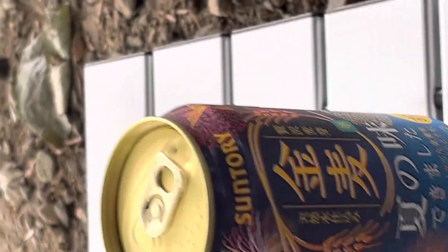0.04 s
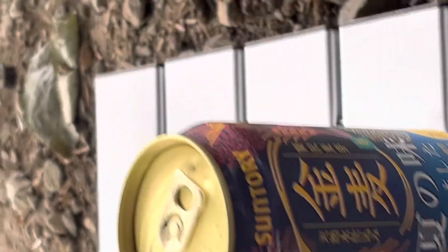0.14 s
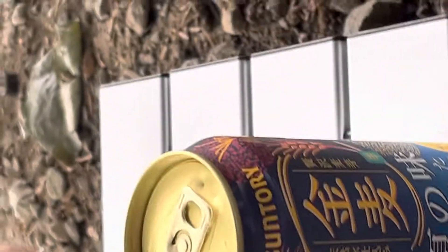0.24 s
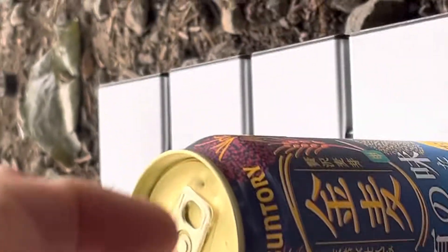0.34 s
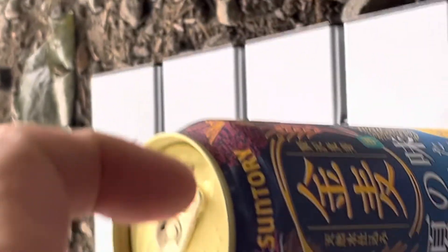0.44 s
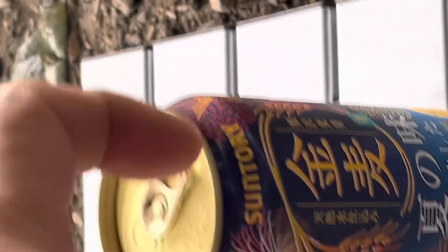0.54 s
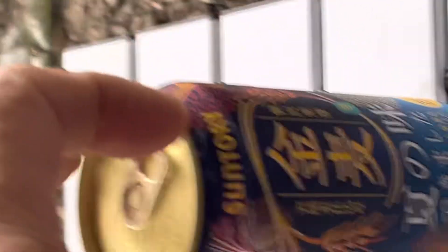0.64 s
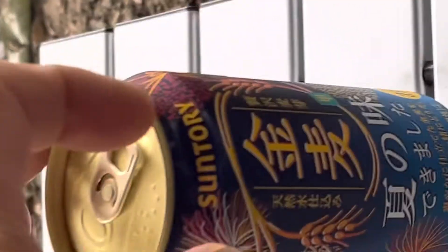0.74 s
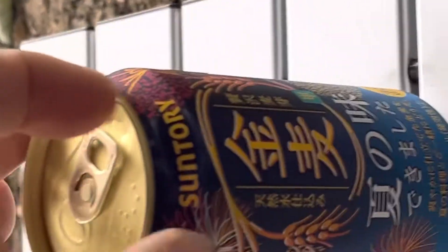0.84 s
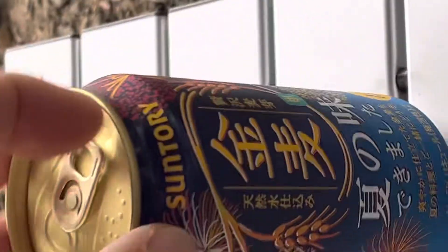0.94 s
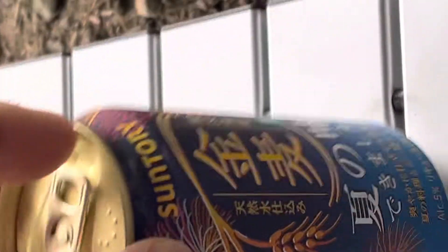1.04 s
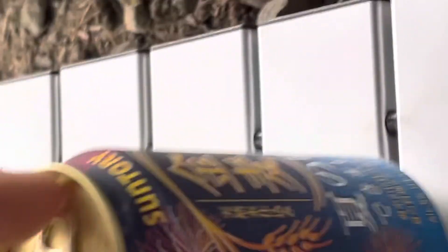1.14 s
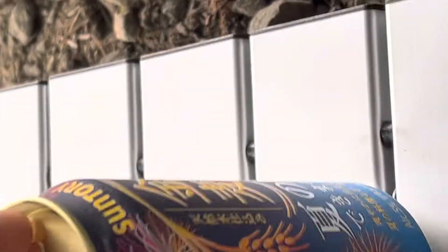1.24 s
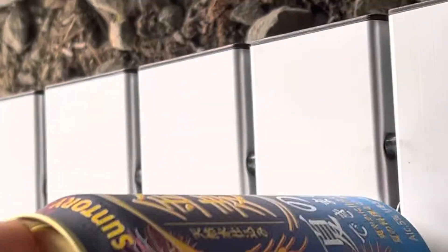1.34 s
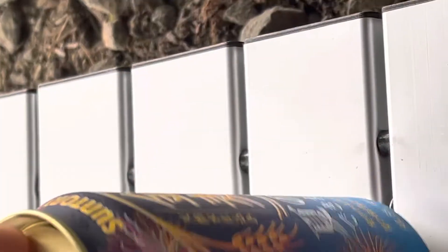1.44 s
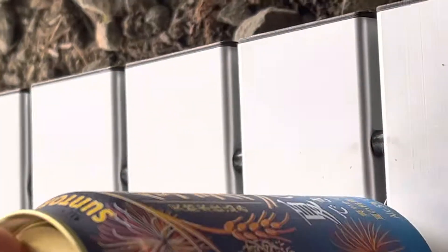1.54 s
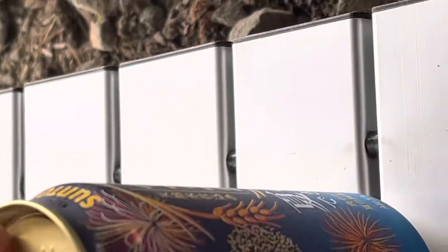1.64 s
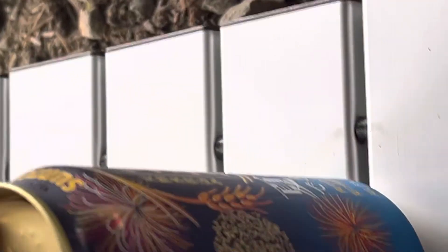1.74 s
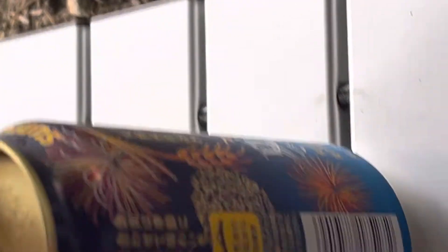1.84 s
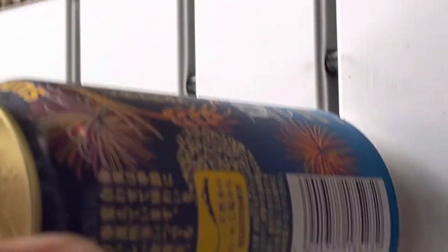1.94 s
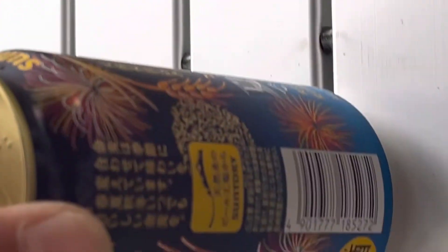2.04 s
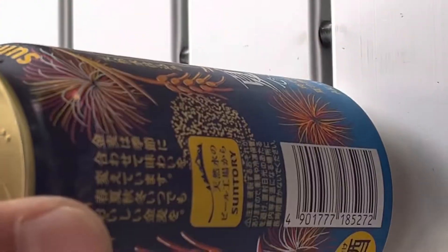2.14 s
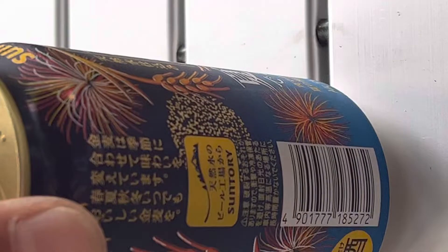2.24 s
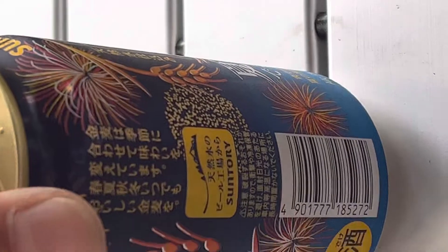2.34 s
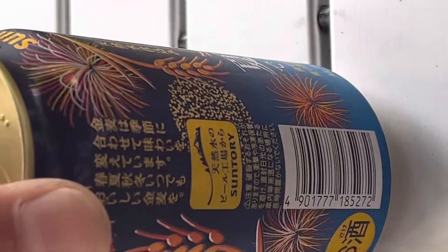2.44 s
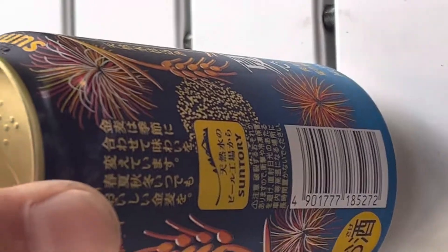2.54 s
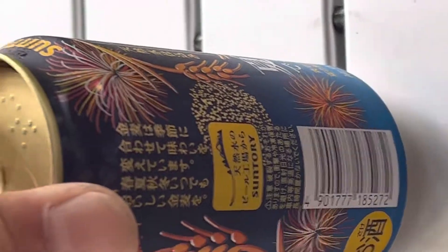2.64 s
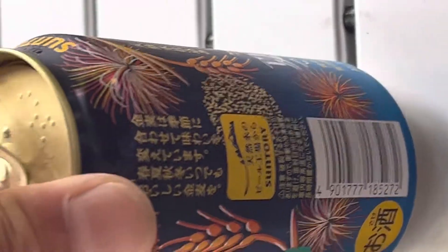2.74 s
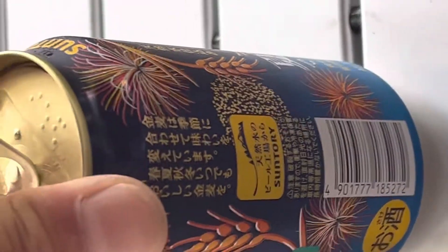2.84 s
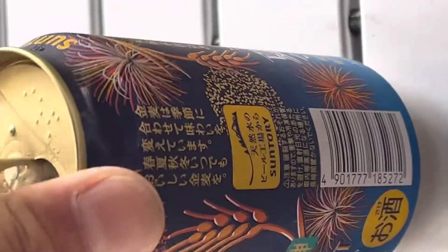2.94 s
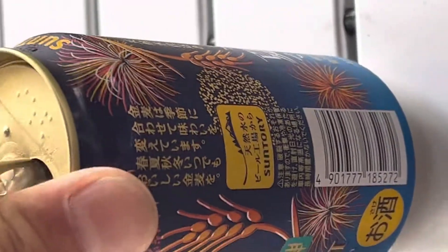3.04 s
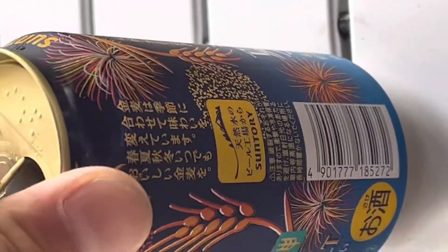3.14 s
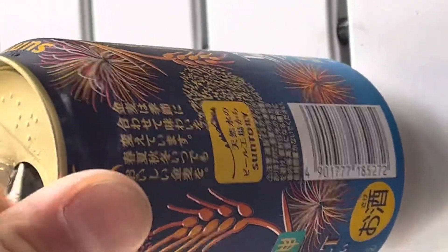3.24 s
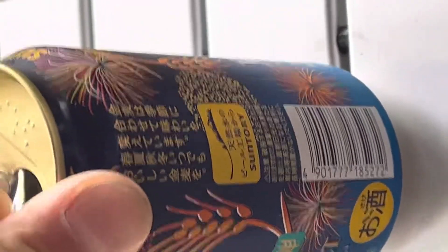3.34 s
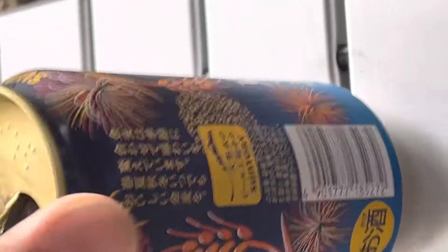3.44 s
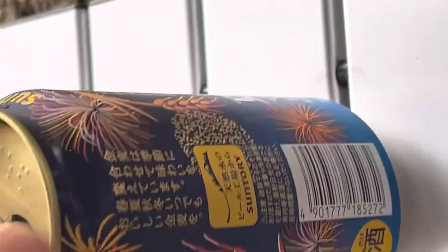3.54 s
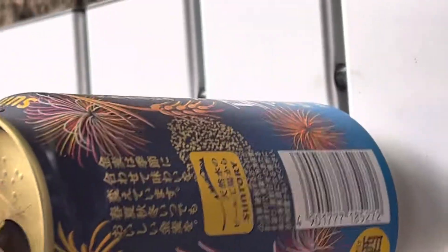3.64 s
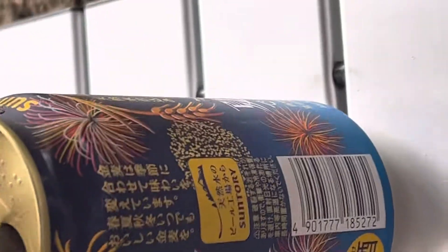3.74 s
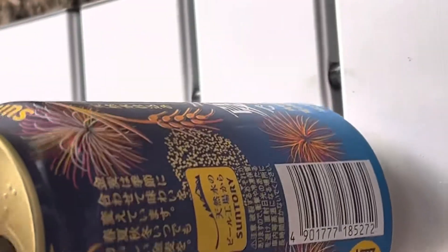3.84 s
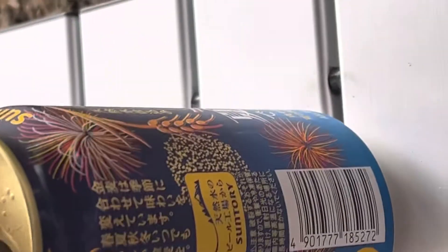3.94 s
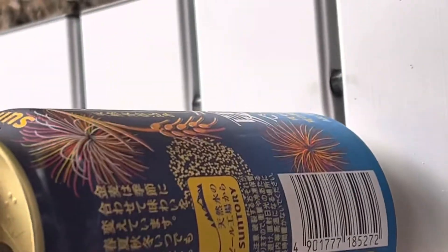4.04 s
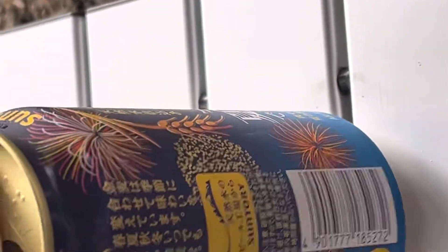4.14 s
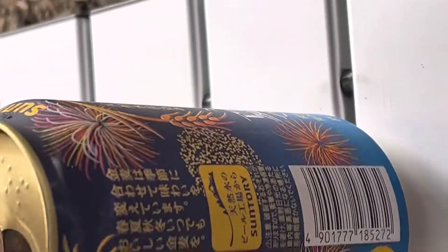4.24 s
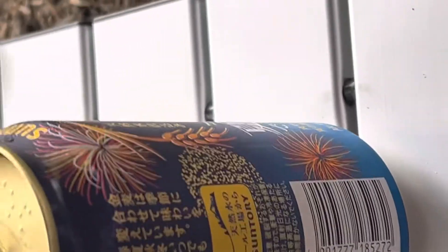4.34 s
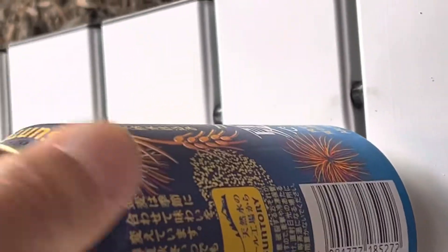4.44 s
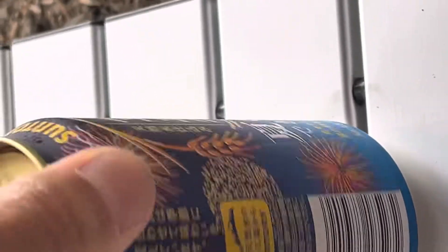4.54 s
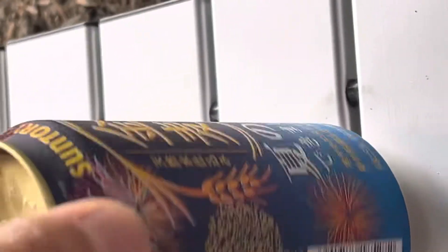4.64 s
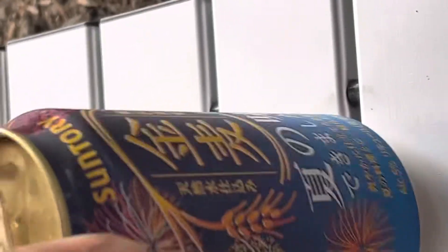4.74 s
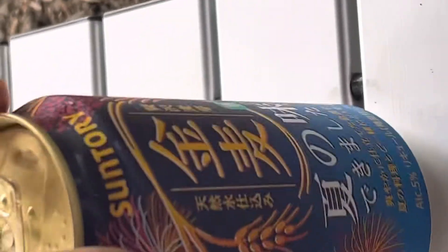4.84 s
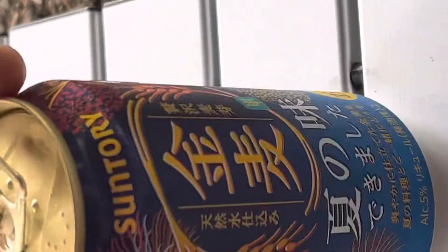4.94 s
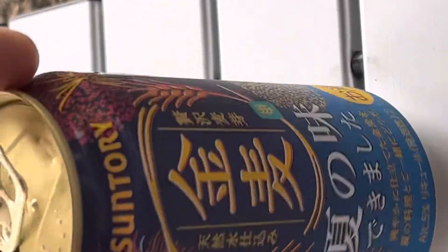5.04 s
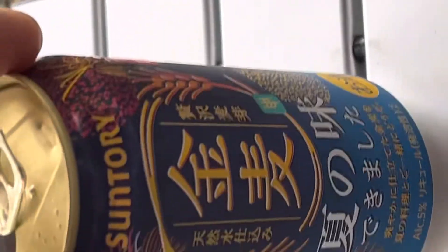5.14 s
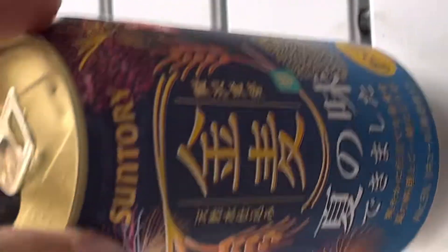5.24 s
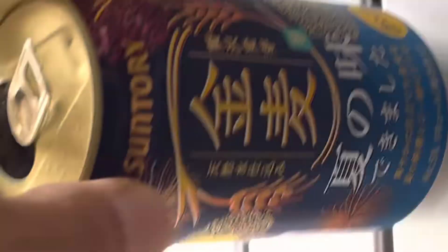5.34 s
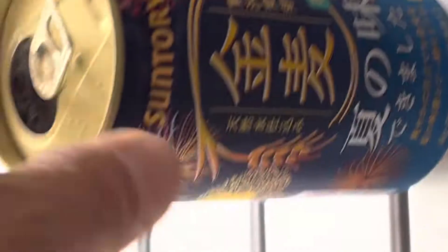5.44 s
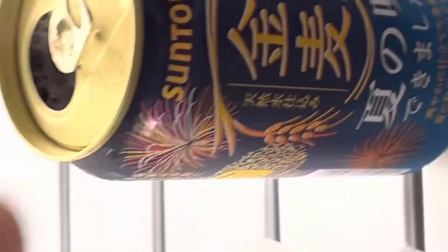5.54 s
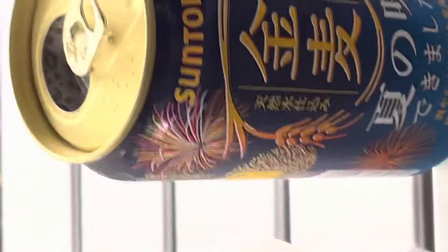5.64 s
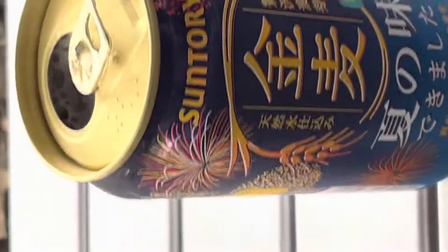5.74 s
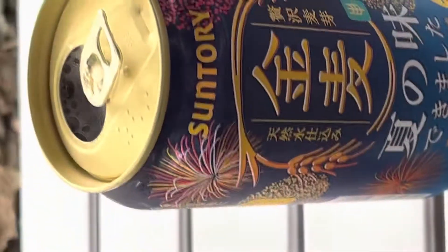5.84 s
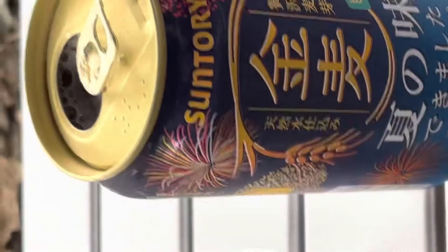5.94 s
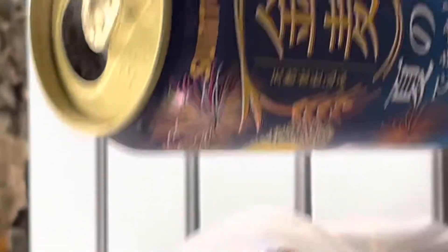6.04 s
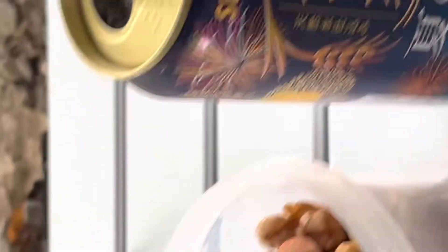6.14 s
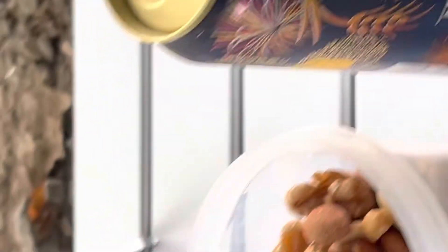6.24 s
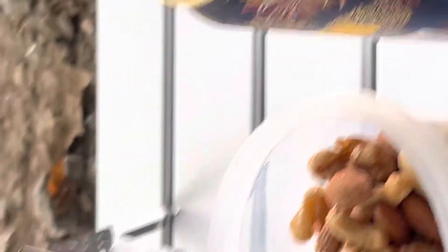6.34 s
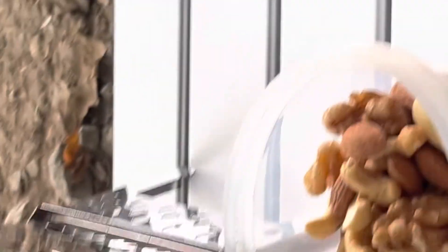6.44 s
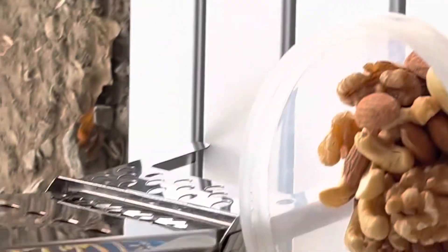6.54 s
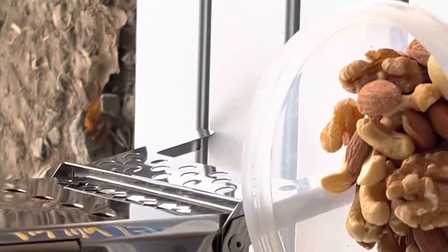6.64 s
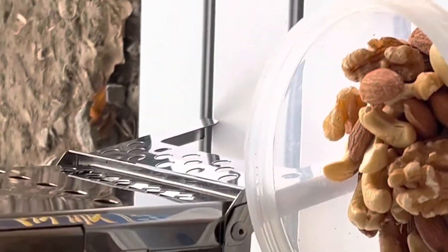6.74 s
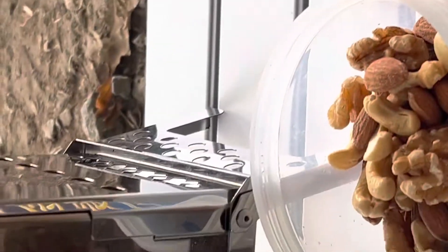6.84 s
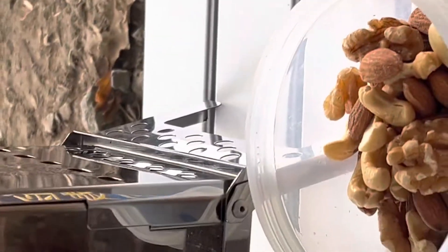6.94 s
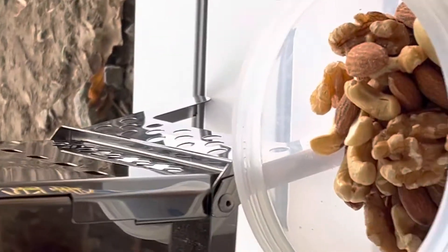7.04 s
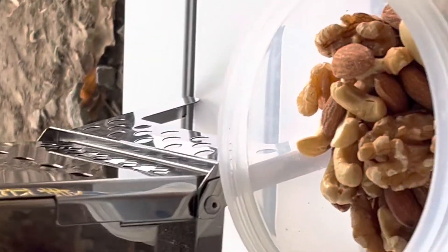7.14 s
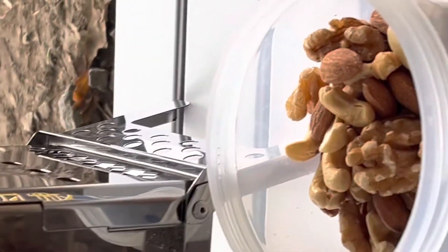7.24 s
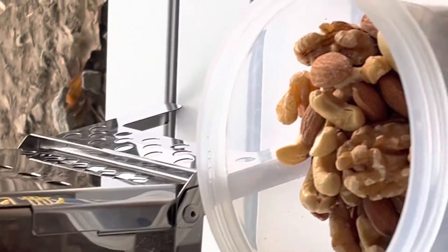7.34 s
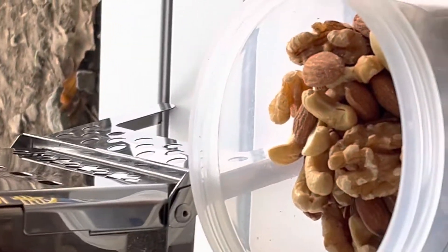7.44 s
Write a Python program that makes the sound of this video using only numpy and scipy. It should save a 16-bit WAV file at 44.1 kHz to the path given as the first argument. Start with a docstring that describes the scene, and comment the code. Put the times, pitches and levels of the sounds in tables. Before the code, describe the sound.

Very close to a small stereo microphone outdoors, skin and nails rub and tick on a full metal can. A loud crack and short gas hiss follow, then a rapid ripping snap as the lid gives way. The tab clicks back, the can is knocked and rubbed again, and the handling stops. Behind are quiet air, distant cicadas and thin bird chirps; near the end one cicada whistles downward in pulses.

```python
"""Opening a drink can outdoors

Skin and nails rub and tap a can on a metal table: noise and short blows ring the can's resonances.
The seal cracks with a hiss of coloured noise, the lid tears in quick jerks, and the tab is bent back.
Behind are far air, rumble, hum and a cicada chorus of noise, whistled cicada calls and swept bird chirps.
A small stereo microphone close by hears it all, with echoes."""
import sys
import numpy as np
from scipy import signal
from scipy.fft import rfft, irfft, next_fast_len
from scipy.io import wavfile

SR = 44100
rng = np.random.default_rng(int(sys.argv[2]) if len(sys.argv) > 2 else 0)


def master(y):
    """Save y as 16-bit WAV."""
    cut = np.clip(np.atleast_2d(y).T, -1, 1)
    pcm = np.round(cut * 32767)  # scale
    wavfile.write(sys.argv[1], SR, pcm.astype(np.int16))


N = 331191
T = np.arange(N) / SR  # time in seconds
SHORT = T[:SR // 3]  # time within one short sound or echo


def amp(db):
    """Turns decibels into gain."""
    return 10 ** (np.asarray(db) / 20)


def unit(x):
    """Scales a signal to rms 1."""
    return x / np.sqrt(np.mean(abs(x) ** 2) + 1e-30)


def decay(age, t60):
    """Dies away by 60 dB every t60 seconds."""
    return np.exp(-np.log(1000) * age / t60)


def curves(rows):
    """Joins the points of each column of a timed table by straight lines."""
    s, *columns = np.transpose(rows)
    return [np.interp(T, s, column) for column in columns]


def add(mix, s, sound):
    """Lays a sound into the mix at time s."""
    part = mix[round(s * SR):][:len(sound)]
    part += sound[:len(part)]


def through(x, response):
    """Passes a sound through a response, keeping its length."""
    return signal.oaconvolve(x, response)[:len(x)]


def colour(points, size=4096):
    """Makes a filter with the given spectrum that responds as early as it can (minimum phase)."""
    hz, db = np.transpose(points)
    bin_hz = abs(np.fft.fftfreq(size, 1 / SR))
    log_gain = np.log(amp(np.interp(np.log(bin_hz + 1), np.log(hz), db)))
    spectrum = np.exp(np.conj(signal.hilbert(log_gain)))
    return np.fft.ifft(spectrum).real[:size // 2]


def noise(points):
    """Steady coloured noise of rms 1."""
    return unit(through(rng.standard_normal(N), colour(points)))


def drift(width_hz):
    """Random complex wander of rms 1, slower for a smaller width."""
    z = rng.standard_normal((N, 2)) @ [1, 1j]
    return unit(signal.sosfilt(signal.butter(2, width_hz, fs=SR, output="sos"), z))


def grit(per_s, spread):
    """Sparse tiny catches of very uneven size."""
    size = amp(spread * np.minimum(rng.exponential(1, N), 4))
    sign = rng.choice([-1, 1], N)
    happens = rng.random(N) < per_s / SR
    return unit(size * sign * happens)


def envelope(start, length, rise, slope_db, t60):
    """Rises smoothly, changes by slope_db over its length, then dies away."""
    age = np.maximum(T - start, 0)
    attack = np.sin(np.pi / 2 * np.minimum(age / rise, 1)) ** 2
    slope = amp(slope_db * np.minimum(age / length, 1))
    return attack * slope * decay(np.clip((age - length) / t60, 0, 2), 1)


def whistle(hz, smear):
    """A wavering tone of rms 1, partly smeared into a narrow band of noise."""
    direct = unit(1.6 + drift(55))
    scatter = ((1 - smear) * direct + smear * drift(300)) / np.hypot(1 - smear, smear)
    return unit((scatter * np.exp(2j * np.pi * np.cumsum(hz * np.ones(N)) / SR)).real)


# What the can rings with. Each row: frequency in Hz, time to fall 60 dB in seconds,
# strength in dB over the direct sound (before the push's own ring_db).
CAN_MODES = [(289, .13, 8), (343, 0.2, 3), (481.5, 0.16, 3), (625, 0.1015, 5), (734.5, 0.051, 6),
             (840, 0.17, 4.5), (1153.7, .115, 15.5), (1392, 0.25, 1), (1545, 0.092, 11), (1691, 0.12, 5.5),
             (1966, 0.27, -2), (2194, 0.033, 5.5), (3180, 0.065, -0.5), (3426, 0.077, 3.5),
             (4740, 0.094, 4.5), (4710, .05, 5.5), (4922, 0.027, 5), (4980, .06, 6), (6817, 0.12, 3),
             (8000, 0.013, 6.5), (11600, 0.11, 1)]
GRIP_DB, GRIP_DETUNE = 1.5, 0.005  # random spread of each mode's strength, and of its pitch as a share


def can(points, ring_db, grip=0):
    """A push of the given colour is heard directly and rings shell and cavity, altered by a shifting grip."""
    body = np.zeros(len(SHORT))
    grips = grip * rng.standard_normal((len(CAN_MODES), 2))
    for (hz, t60, db), (weight, detune) in zip(CAN_MODES, grips):
        damping = np.log(1000) / t60
        pitch = hz * (1 + GRIP_DETUNE * detune)
        ring = decay(SHORT, t60) * np.cos(2 * np.pi * pitch * SHORT)
        body += amp(db + ring_db + GRIP_DB * weight) * 2 * damping / SR * ring
    body[0] += 1  # the direct sound
    return through(body, colour(points))


def blow(response, db, t60, sharp, size):
    """One impact and its dying scrape; db is the level over the first size samples."""
    scrape = rng.standard_normal(len(SHORT)) * decay(SHORT, t60)
    force = scrape / np.linalg.norm(scrape)
    force[0] += sharp
    sound = through(force, response)
    return amp(db) * sound / np.sqrt(np.mean(sound[:size] ** 2))


# Levels of the far air, the low rumble and the far cicadas. Each row: time in seconds, level in dB.
AIR_LEVELS = [(0, -70), (.4, -66.5), (1.8, -70), (3.6, -67.5), (5.4, -73.5), (6.3, -71.5), (7.5, -72.5)]
RUMBLE_LEVELS = [(0, -72.5), (.4, -65.5), (1.8, -75), (3.0, -88), (5.6, -86), (6.25, -69.5), (6.65, -83),
                 (7.1, -72)]
CHORUS_LEVELS = [(0, -71), (1.2, -74), (2.6, -74), (4.0, -75.5), (5.45, -72.5), (6.6, -76.5)]
# Their tone colours. Each row: frequency in Hz, relative strength in dB.
AIR_SPECTRUM = [(25, -16), (70, -1), (200, -8), (370, -6.5), (620, -6.5), (1150, 2), (1700, -3.5),
                (2500, -11.5), (4400, -21.5), (6000, -25), (9000, -30), (15000, -36)]
RUMBLE_SPECTRUM = [(20, -23.5), (60, -1), (150, -1), (230, -1), (335, 0), (480, -6), (1200, -23),
                   (4000, -53.5)]
CHORUS_SPECTRUM = [(1500, -58.5), (2700, -14), (2950, 2.5), (3250, -7.5), (3520, 2.5), (3850, -22),
                   (4600, -28.5), (7000, -63)]
# A faint far hum comes and goes. Each row: start in seconds, length in seconds, pitch in Hz, level in dB.
FAR_HUMS = [(0.0, 0.9, 391, -80.5), (2.0, 0.57, 375, -76), (6.709, 0.8, 332.7, -72.5)]


def outdoors():
    """Far air, rumble and distant cicadas are wavering coloured noise; a hum is a wavering tone."""
    (air_db,), (rumble_db,), (chorus_db,) = map(curves, (AIR_LEVELS, RUMBLE_LEVELS, CHORUS_LEVELS))
    air = amp(air_db + 0.92 * drift(5).real) * noise(AIR_SPECTRUM)
    rumble = amp(rumble_db + 1.8 * drift(9.6).real) * noise(RUMBLE_SPECTRUM)
    chorus = amp(chorus_db + 1.5 * drift(12).real) * noise(CHORUS_SPECTRUM)
    waver = drift(10)
    hum = np.zeros(N)
    for s, length, hz, db in FAR_HUMS:
        tone = unit((waver * np.exp(2j * np.pi * hz * T)).real)
        hum += amp(db) * envelope(s, length, rise=0.26, slope_db=-3.5, t60=.9) * tone
    return air + rumble + hum + chorus


# One cicada is just ending its call.
ENDING_HZ, ENDING_DB, ENDING_LENGTH_S, ENDING_T60_S = 4350, -80, 0.35, 0.7
# A nearer one starts later: its smeared start clears to a whistle.
CALL_S, CALL_RISE_S, CALL_DB, CALL_FADE_DB_PER_S = 6.29, 0.043, -61, -2.5
CLEAR_S, CLEAR_SMEAR, SMEAR_LOSS_DB = 0.19, 0.14, -11  # clearing time, smear that stays, loss at full smear
SYLLABLES_PER_S, SYLLABLE_PEAK_S = 12.35, 6.52  # rate, and the time of one loudest point
SYLLABLE_DEPTH = 0.58  # for a tone without smear
SYLLABLE_SWING_HZ, CALL_WANDER_HZ = 22, 18  # each syllable slides down a little
# Its pitch swoops down and then sags. Each row: time in seconds, pitch in Hz before swing and wander.
CALL_PITCHES = [(6.35, 4020), (6.42, 3710), (6.51, 3507), (6.62, 3356), (6.87, 3306), (7.08, 3148),
                (7.51, 3077)]


def cicada():
    """One call fades out; later a falling whistle starts, pulsing in syllables and smeared by the trees."""
    age = np.maximum(T - CALL_S, 0)
    hz, = curves(CALL_PITCHES)
    smear = np.clip(CLEAR_SMEAR + (1 - CLEAR_SMEAR) * np.exp(-(age / CLEAR_S) ** 2), 0, 1)
    beat = 2 * np.pi * SYLLABLES_PER_S * (T - SYLLABLE_PEAK_S)
    hz = hz - SYLLABLE_SWING_HZ * np.sin(beat) + CALL_WANDER_HZ * drift(4.96).real
    syllables = 1 + SYLLABLE_DEPTH * (1 - smear) * np.cos(beat)
    rise = np.minimum(age / CALL_RISE_S, 1)
    level = rise * amp(CALL_DB + CALL_FADE_DB_PER_S * age + SMEAR_LOSS_DB * smear)
    ending = amp(ENDING_DB) * envelope(0, ENDING_LENGTH_S, 1 / SR, 0, ENDING_T60_S)
    return level * syllables * whistle(hz, smear) + ending * whistle(ENDING_HZ, smear=0.82)


# A stroke presses in over part of its length, eases, and lifts off; long strokes lift off slowly.
PRESS_SHARE, EASE_DB, LIFT_T60_S, LIFT_PER_LENGTH = 0.42, -5.5, 0.057, 1
GRAIN_HZ, GRAIN_DB, UNEVEN_HZ, UNEVEN_DB = 506, 1, 40, 1.5  # skin ridges roughen it; the pressure wavers
# Strokes of skin and nail over the can. Each row: start in seconds, length in seconds, level in dB,
# share of gritty catching from 0 to 1.
RUB_STROKES = [(0.2, 0.97, -69, 0.33), (0.903, 0.032, -49, 0.14), (0.95, 0.044, -45.5, 0),
               (0.991, 0.11, -44.5, 0.38), (1.171, 0.042, -45.5, 0.55), (1.258, 0.19, -52, 0.8),
               (1.378, 0.067, -45.5, 0.6), (1.454, 0.041, -47.5, 0.75), (1.494, 0.061, -47.5, 0.6),
               (3.228, 0.048, -53.5, 0.45), (3.654, 0.32, -64.5, 0.23), (4.146, 0.034, -51.5, 0.16),
               (4.272, 0.02, -54.5, 0.4), (4.349, 0.38, -62.5, 0.86), (4.501, 0.072, -58, 0.1),
               (4.536, 0.23, -45, 0), (4.601, 0.042, -39.5, 0.08), (4.784, 0.047, -53, 0),
               (4.849, 0.082, -49.5, 0.18), (4.978, 0.091, -52.5, 0.36), (5.183, 0.067, -52, 0),
               (5.875, 0.12, -59.5, 0.45), (6.196, 0.095, -68, 0.37)]
# Colours of sliding skin, of bright catches or ticks (touches use it too), and of the shaken body.
# Each row: frequency in Hz, relative strength in dB.
RUB_SPECTRUM = [(80, -23), (300, -32.5), (700, -12), (1200, -3), (2300, -0.5), (3300, -1.5), (5200, -5.5),
                (7500, -10.5), (11000, -13.5), (15500, -18)]
TICK_SPECTRUM = [(200, -22.5), (900, -17), (2000, 9), (3000, 7), (4800, 4.5), (7500, -2.5), (11000, -7),
                 (15500, -17)]
JUDDER_SPECTRUM = [(60, -6.5), (160, -8.5), (240, -1), (450, -1.5), (750, -2), (1200, -4.5), (1700, -2),
                   (3000, -13.5), (6000, -23), (15000, -46.5)]


def rubbing():
    """Skin slides with a smooth hiss; a nail catches in grains that also shake the heavier body."""
    sliding, catching = np.zeros((2, N))  # power of each
    for s, length, db, share in RUB_STROKES:
        lift_t60 = LIFT_T60_S + LIFT_PER_LENGTH * length
        pressure = amp(db) * envelope(s, length, PRESS_SHARE * length, EASE_DB, lift_t60)
        share = np.clip(share, 0, 1)
        sliding += ((1 - share) * pressure) ** 2
        catching += (share * pressure) ** 2
    ridges = rng.standard_normal(N) * amp(GRAIN_DB * drift(GRAIN_HZ).real)
    skin = unit(through(ridges, can(RUB_SPECTRUM, ring_db=-2.5)))
    catches = unit(through(grit(per_s=330, spread=2.25), can(TICK_SPECTRUM, ring_db=-6)))
    judder = unit(through(grit(per_s=300, spread=2.1), can(JUDDER_SPECTRUM, ring_db=0.5)))
    nail = 0.3 * catches + 1.09 * judder
    uneven = amp(UNEVEN_DB * drift(UNEVEN_HZ).real)
    return uneven * (np.sqrt(sliding) * skin + np.sqrt(catching) * nail)


KNOCK_DELAY_S, KNOCK_T60_S, KNOCK_PER_SCRAPE = 0.002, 0.048, 0.4  # body answers just after the tick
TABLE_RING_DB, TABLE_RING_T60_S = -19.5, 0.33  # a knock also sets the table ringing faintly
# Nail, tab and can touching. Each row: time in seconds, bright tick level in dB, dull knock level in dB,
# time for the tick's scrape to fall 60 dB in seconds.
TOUCH_TIMES = [(0.473, -60.5, -65, 0.072), (0.9568, -50, -66, 0.03), (1.044, -37.5, -47, 0.18),
               (1.087, -41, -52, 0.021), (1.115, -43, -70, 0.033), (1.156, -51.5, -57.5, 0.067),
               (1.18, -55, -52.5, 0.049), (1.195, -50.5, -75, 0.02), (1.2479, -33.5, -43.5, 0.038),
               (1.269, -56.5, -50, 0.047), (1.309, -45.5, -45, 0.07), (1.387, -48, -53, 0.09),
               (1.428, -49.5, -55.5, 0.036), (1.4548, -52.5, -50.5, 0.04), (1.478, -58, -54, 0.026),
               (1.653, -52.5, -43, 0.014), (2.8612, -63, -65, 0.008), (3.029, -46.5, -64, 0.013),
               (3.05, -34.5, -65, 0.0061), (3.0618, -45.5, -67, 0.018), (3.068, -41.5, -75, 0.02),
               (3.081, -51, -61, 0.08), (3.109, -36.5, -57, 0.038), (3.126, -58, -44, 0.016),
               (3.3672, -63.5, -59.5, 0.017), (3.419, -57.5, -56.5, 0.046), (3.437, -42.5, -54.5, 0.032),
               (3.453, -36, -41.5, 0.033), (3.468, -43.5, -38, 0.023), (3.7507, -50, -45, 0.083),
               (3.8694, -40, -37.5, 0.016), (4.041, -54.5, -64, 0.0062), (4.0529, -47.5, -58.5, 0.0073),
               (4.082, -64.5, -58, 0.071), (4.2485, -63, -62.5, 0.022), (4.2914, -38.5, -32, 0.025),
               (4.334, -67, -55.5, 0.04), (4.468, -71, -64.5, 0.02), (4.9881, -58.5, -68, 0.015),
               (5.174, -73, -65.5, 0.026), (6.622, -67, -70, 0.015)]
# Colours of the tab, the knocked body and the table. Each row: frequency in Hz, relative strength in dB.
TAB_SPECTRUM = [(200, -27.5), (900, -15.5), (2000, -3), (3200, -9.5), (5200, -1.5), (8000, -5),
                (11000, -5.5), (15500, -7.5)]
KNOCK_SPECTRUM = [(40, -19), (190, -22), (310, -7), (480, -1.5), (750, -6.5), (1300, -1), (2000, -6.5),
                  (3000, -12), (6000, -30), (15000, -46.5)]
TABLE_SPECTRUM = [(100, -34), (300, -13.5), (480, -1), (700, -4), (1000, -12.5), (1600, -11.5), (3000, -28),
                  (15000, -59.5)]


def touches():
    """Each touch is a bright tick, then a duller knock that rings the full can and the table under it."""
    out = np.zeros(N)
    rim, tab = can(TICK_SPECTRUM, ring_db=-6.5), can(TAB_SPECTRUM, ring_db=-7.0)
    table = colour(TABLE_SPECTRUM)
    for s, tick_db, knock_db, t60 in TOUCH_TIMES:
        # a touch that hardly moves the body has caught the thin tab, and is brighter
        on_tab = np.clip((tick_db - knock_db) / 18, 0, 1)
        struck = (1 - on_tab) * rim + on_tab * tab
        add(out, s, blow(struck, tick_db, t60, sharp=.25, size=353))
        body = can(KNOCK_SPECTRUM, ring_db=-4, grip=1)
        knock_t60 = KNOCK_T60_S + KNOCK_PER_SCRAPE * t60
        knock = blow(body, knock_db, knock_t60, sharp=0.3, size=882)
        table_ring = blow(table, knock_db + TABLE_RING_DB, TABLE_RING_T60_S, sharp=0, size=882)
        add(out, s + KNOCK_DELAY_S, knock + table_ring)
    return out


# The jet grows as the crack widens, then the pressure is spent.
CRACK_S, JET_LENGTH_S, JET_RISE_S = 2.631, 0.04, 0.005
JET_DB, JET_GROWTH_DB, JET_T60_S = -17, 2, 0.04
SEEP_DB, SEEP_T60_S = -36.5, 0.088  # the last gas seeps out more slowly
# Colours of the crack and the gas. Each row: frequency in Hz, relative strength in dB.
CRACK_SPECTRUM = [(100, -36), (300, -38), (600, -35.5), (1000, -29), (1500, -27), (2200, -8.5),
                  (3000, -0.5), (4000, -3.5), (4900, 3.5), (6500, -4), (8500, -5), (10200, -8.5),
                  (12500, -9), (15300, -19.5)]
GAS_SPECTRUM = [(100, -15), (300, -22), (1000, -16), (2500, -9), (3600, -9.5), (5200, -6), (6600, -12),
                (7600, -5.5), (9000, -10), (10000, 1.5), (11500, -4), (13000, -5), (14000, -13.5),
                (15400, 6.5)]


def venting():
    """The seal cracks with a blow, and a turbulent jet of gas makes fluttering noise."""
    jet = amp(JET_DB) * envelope(CRACK_S, JET_LENGTH_S, JET_RISE_S, JET_GROWTH_DB, JET_T60_S)
    seep = amp(SEEP_DB) * envelope(CRACK_S, JET_LENGTH_S, JET_RISE_S, 0, SEEP_T60_S)
    turbulence = amp(1.9 * drift(250).real) * noise(GAS_SPECTRUM)
    out = (jet + seep) * turbulence
    crack = can(CRACK_SPECTRUM, ring_db=-4.5)
    add(out, CRACK_S, blow(crack, db=-17.5, t60=.016, sharp=0.97, size=310))
    return out


# Gusts of gas and bumps of the hand shake the microphone. Each row: start in seconds, level in dB,
# time to swell in seconds, pitch in Hz.
MICROPHONE_BUMPS = [(2.632, -50.5, 0.019, 132), (2.675, -52, 0.019, 54.6), (2.923, -58, 0.014, 78),
                    (3.462, -62, 0.016, 72), (4.81, -60, 0.031, 62)]


def bumps():
    """Gusts and bumps shake the microphone: soft, low, wavering tones that swell and fade."""
    out, wobble = np.zeros(N), unit(1 + drift(33))
    for s, db, rise, hz in MICROPHONE_BUMPS:
        age = np.maximum(T - s, 0) / rise
        thump = unit((wobble * np.exp(2j * np.pi * hz * T)).real)
        out += amp(db) * age * np.exp(1 - age) * thump
    return out


# The score line gives way in evenly spaced jerks that gain force; the lid snaps just before the last one.
TEAR_S, JERK_GAP_S, SNAP_S = 2.8877, 0.0064, 2.9177
JERK_DB, FIRST_JERK_DB, JERK_T60_S = -21, -7, 0.032  # the first jerk is this much weaker
# The flap then scrapes down into the can and creaks as it settles.
FOLD_LENGTH_S, FOLD_RISE_S, FOLD_DB, FOLD_EASE_DB, FOLD_T60_S = 0.031, 0.016, -36, -2.5, 0.06
SETTLE_LENGTH_S, SETTLE_DB = 0.105, -62.5
# Colours of the tear, the snap and the folding flap. Each row: frequency in Hz, relative strength in dB.
TEAR_SPECTRUM = [(100, -34), (300, -39), (600, -24.5), (1000, -26), (1500, -11.5), (2200, -9.5),
                 (3000, -16), (4000, -8.5), (4900, -0.5), (6500, -12), (8500, -16.5), (10200, -8.5),
                 (12500, -19), (15300, -16.5)]
SNAP_SPECTRUM = [(100, -38.5), (300, -37.5), (600, -15.5), (1000, -1.5), (1500, 0.5), (2200, 1.5),
                 (3000, -9.5), (4000, -6.5), (4900, -21), (6500, -11.5), (8500, -18.5), (10200, -11),
                 (12500, -23.5), (15300, -23.5)]
FOLD_SPECTRUM = [(80, -18.5), (400, -6.5), (1400, 1), (2300, -2), (4000, -7.5), (9000, -10.5), (15500, -18)]


def tearing(count=6):
    """The lid rips in a row of blows, with a snap just before the last; the flap scrapes in dense grit."""
    fold = amp(FOLD_DB) * envelope(SNAP_S, FOLD_LENGTH_S, FOLD_RISE_S, FOLD_EASE_DB, FOLD_T60_S)
    settle = amp(SETTLE_DB) * envelope(SNAP_S, SETTLE_LENGTH_S, FOLD_RISE_S, 0, FOLD_T60_S)
    scrape = unit(through(grit(per_s=1200, spread=2.8), can(FOLD_SPECTRUM, ring_db=-5.0)))
    out = (fold + settle) * scrape
    lid = can(TEAR_SPECTRUM, ring_db=-15.5)
    for k in range(count):
        jerk_db = JERK_DB + FIRST_JERK_DB / (1 + k)
        add(out, TEAR_S + k * JERK_GAP_S, blow(lid, jerk_db, JERK_T60_S, sharp=.6, size=176))
    snap = can(SNAP_SPECTRUM, ring_db=-24.5)
    add(out, SNAP_S, blow(snap, db=-15.5, t60=0.019, sharp=1.6, size=330))
    return out


# Bird chirps. Each row: time in seconds, level in dB.
BIRD_CHIRPS = [(3.709, -76), (3.825, -69.5), (5.08, -78), (5.16, -74.5), (5.283, -73.5), (6.775, -74),
               (6.866, -68.5), (6.975, -71)]


def bird(top_hz=8200, end_hz=4100, length=0.012):
    """Thin falling chirps swell, then fade as they drop, arriving mostly as echoes from the trees."""
    out, t = np.zeros(N), T[:round(length * SR)]
    sweep = np.sin(2 * np.pi * np.cumsum(np.linspace(top_hz, end_hz, len(t))) / SR)
    loudness = np.interp(t / length, [0, .3, .45, .65, 1], [0.056, 0.96, 1.0, .3, 0.3])
    chirp = loudness * sweep
    for s, db in BIRD_CHIRPS:
        echoes = rng.standard_normal(len(SHORT)) * decay(SHORT, 0.35)
        echoes[0] += 12  # the direct sound
        call = through(echoes, chirp)
        add(out, s, amp(db) * call / np.std(call[:SR // 15]))
    return out


def reflections(x, t60, delay, top_hz, low_hz=140):
    """Scattered echoes, different in each channel, duller and thinner than the source."""
    taps = rng.standard_normal((2, len(SHORT))) * decay(SHORT, t60) * (SHORT > delay)
    taps /= np.linalg.norm(taps, axis=1, keepdims=True)
    taps = signal.lfilter(*signal.butter(2, [low_hz, top_hz], "band", fs=SR), taps)
    return np.array([through(x, tap) for tap in taps])


TABLE_DB, HAND_DB, AROUND_DB, DIFFUSE_DB = -21.5, -13.5, -24, -7  # gains of the echoes
TABLE_DELAY_S = 0.0007  # the table top mirrors the can


def scene():
    """The can is heard directly, off the hand and table, and faintly off the surroundings."""
    near = touches() + rubbing() + venting() + tearing()
    far = outdoors() + cicada() + bird()
    table = np.interp(T - TABLE_DELAY_S, T, near, left=0)
    hand = reflections(near, t60=0.025, delay=0.0004, top_hz=14000)
    around = reflections(near, t60=0.27, delay=0.012, top_hz=5930)
    diffuse = reflections(far, t60=0.25, delay=0.0049, top_hz=7963)
    near_echoes = amp(TABLE_DB) * table + amp(HAND_DB) * hand + amp(AROUND_DB) * around
    return near + far + bumps() + near_echoes + amp(DIFFUSE_DB) * diffuse


LOW_CUT_HZ, EDGE_HZ = 34, 15900  # bottom and top of the band
# Phase lead of the left channel over the right, a fixed stereo widening in the recorder.
# Each row: frequency in Hz, phase lead in radians.
STEREO_LEADS = [(0, 0), (400, -.6), (900, -.5), (1700, 0), (2650, 2.2), (3600, .9), (5000, 1.5),
                (5900, 3.1), (7600, 6.2), (8400, 6.4), (10000, 9.3), (10700, 9.6), (11900, 12.5),
                (13100, 12.7), (14200, 15.6), (16000, 16)]


def record(dry):
    """A phase lead widens the stereo; deepest bass is cut, sharp peaks are rounded, then the top is cut."""
    size = next_fast_len(N + SR // 10)
    lead = np.interp(np.fft.rfftfreq(size, 1 / SR), *np.transpose(STEREO_LEADS))
    turn = np.exp(.5j * np.array([lead, -lead]))  # half the lead to each side
    pair = irfft(rfft(dry, size) * turn, size)[:, :N]
    pair = signal.sosfilt(signal.butter(3, LOW_CUT_HZ, "high", fs=SR, output="sos"), pair)
    pair = pair / (1 + (pair / .78) ** 4) ** .25  # peaks level off below .78
    top_cut = signal.firwin(511, EDGE_HZ, window=("kaiser", 10), fs=SR)
    return signal.oaconvolve(pair, top_cut[None], "same")


dry = scene()
out = record(dry)
master(out)
```